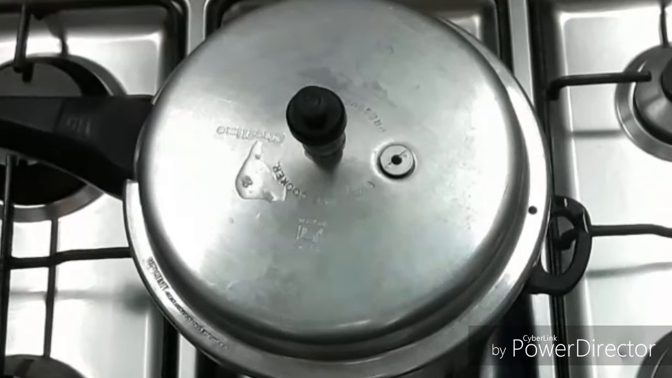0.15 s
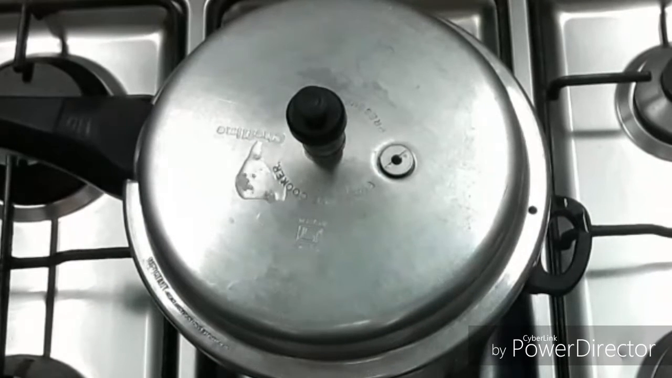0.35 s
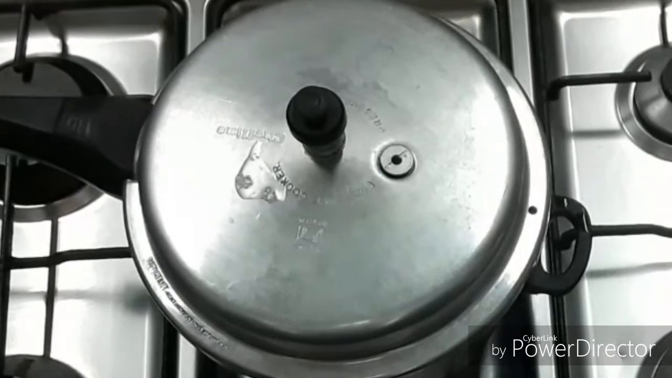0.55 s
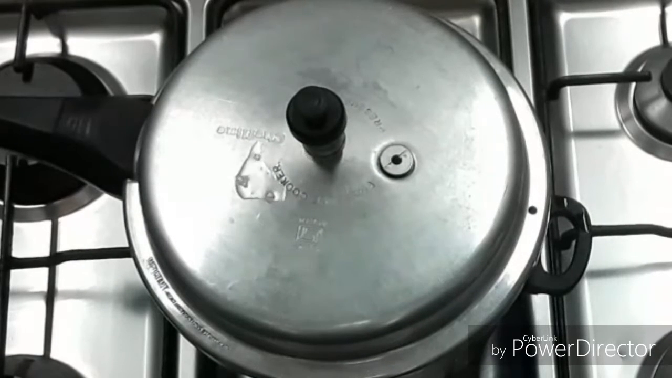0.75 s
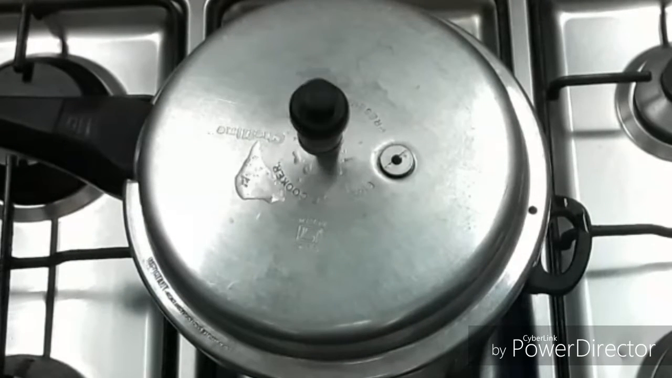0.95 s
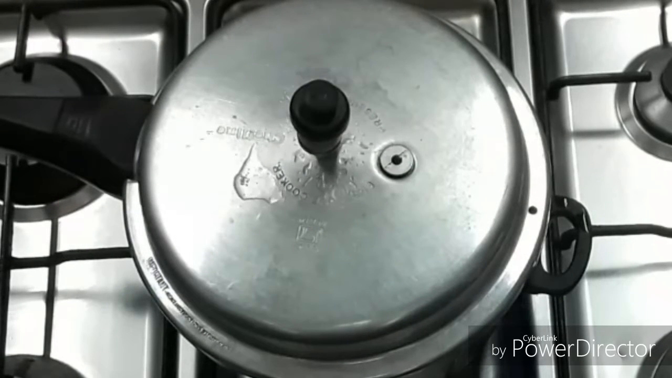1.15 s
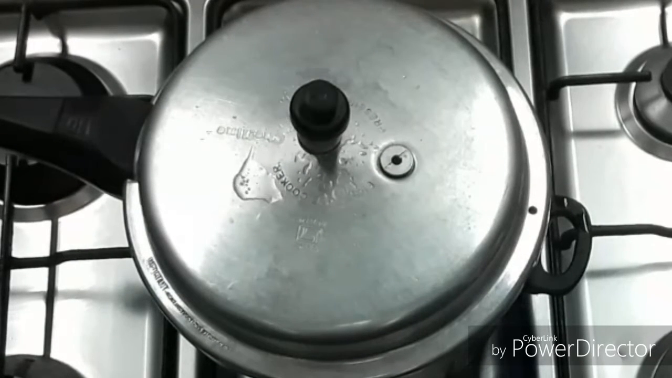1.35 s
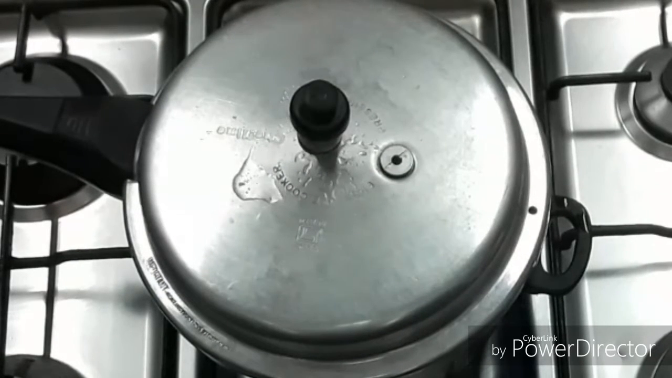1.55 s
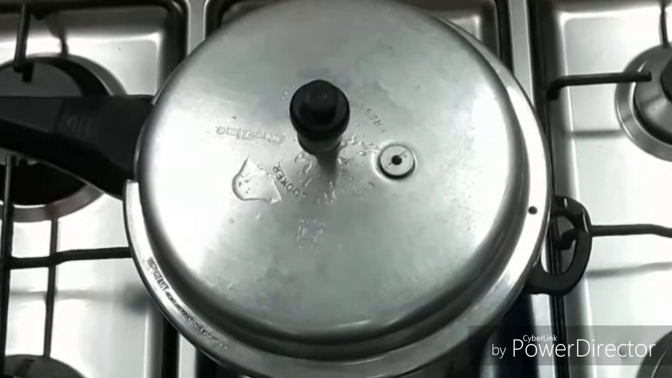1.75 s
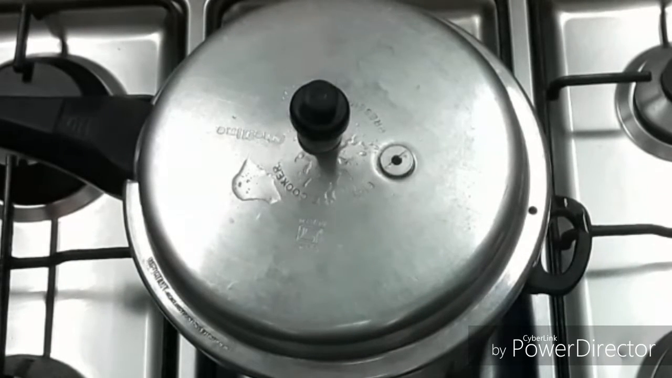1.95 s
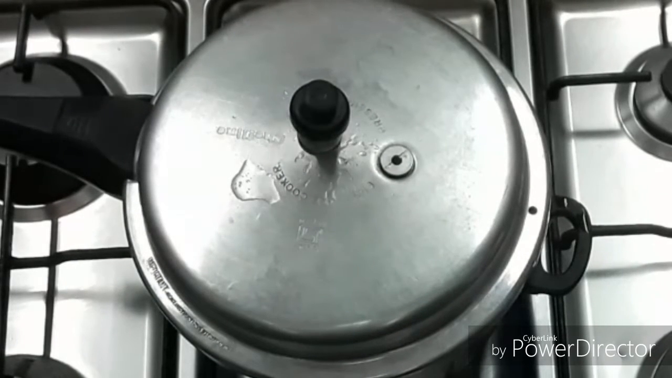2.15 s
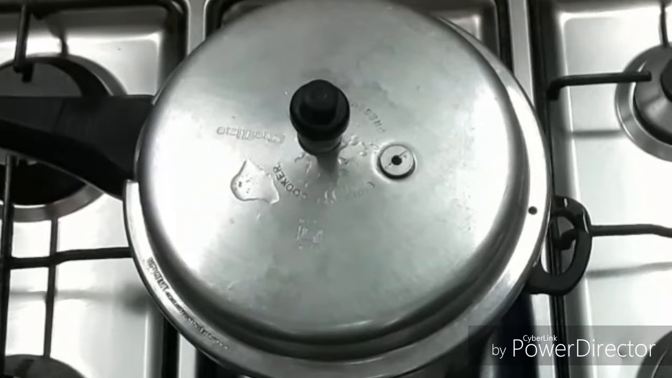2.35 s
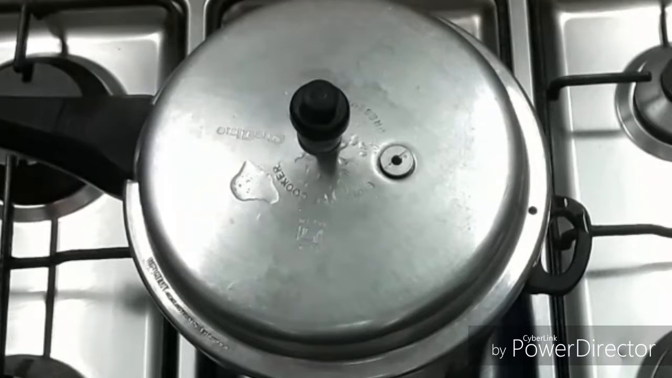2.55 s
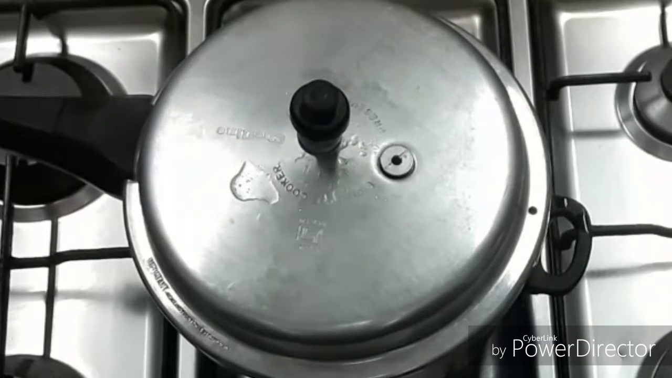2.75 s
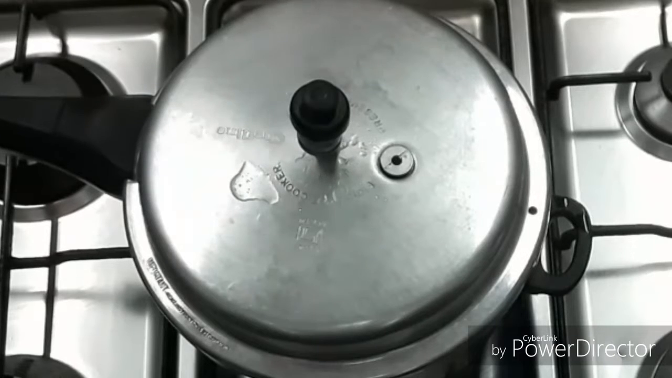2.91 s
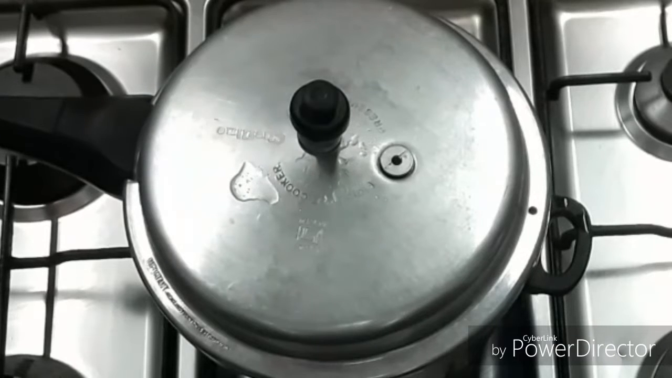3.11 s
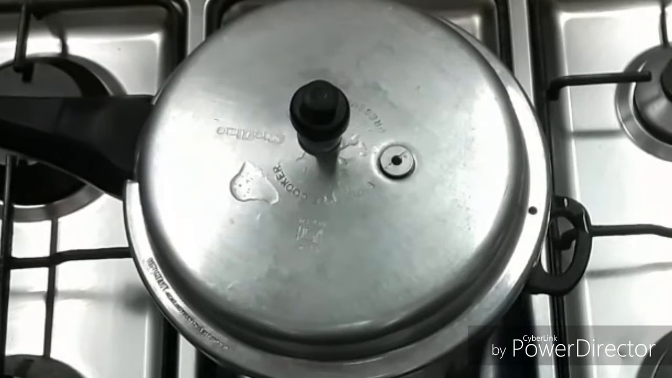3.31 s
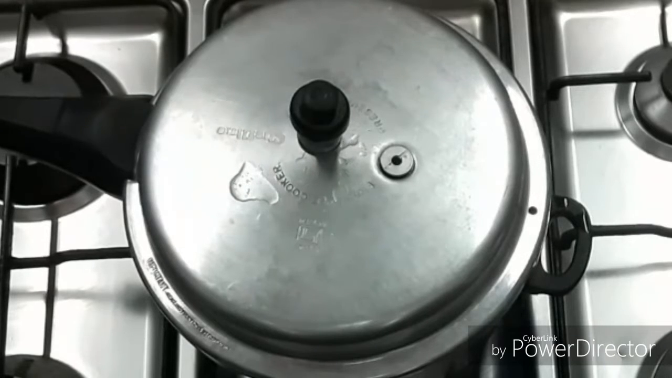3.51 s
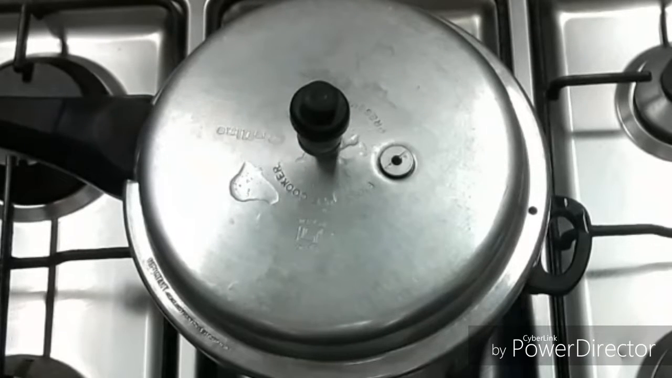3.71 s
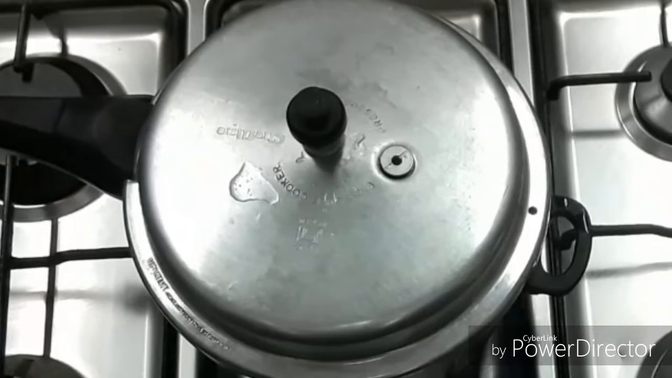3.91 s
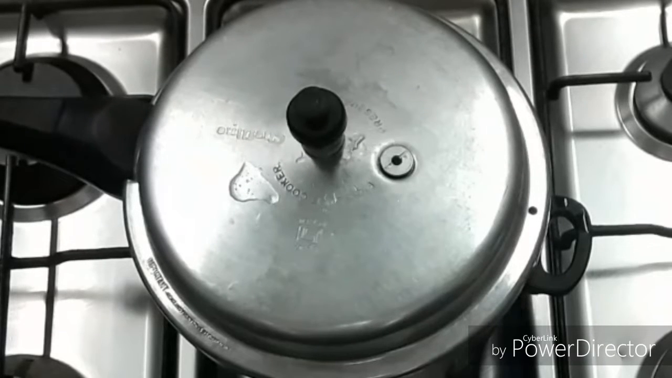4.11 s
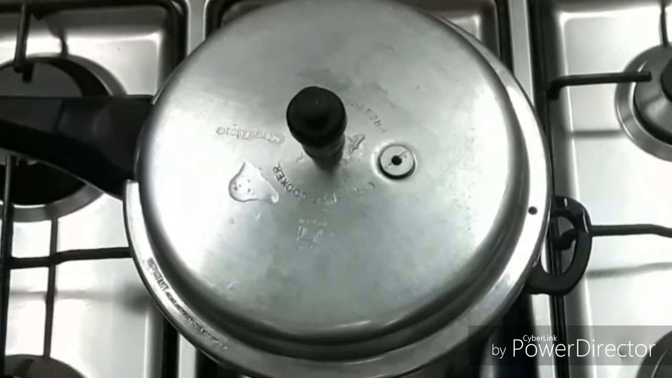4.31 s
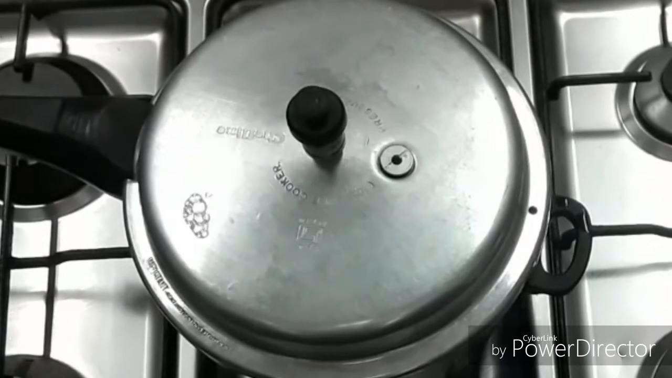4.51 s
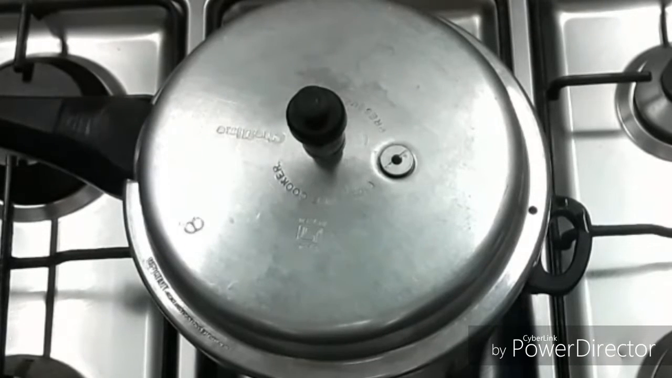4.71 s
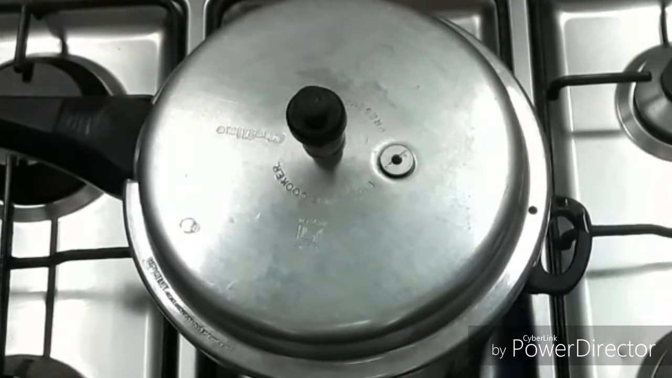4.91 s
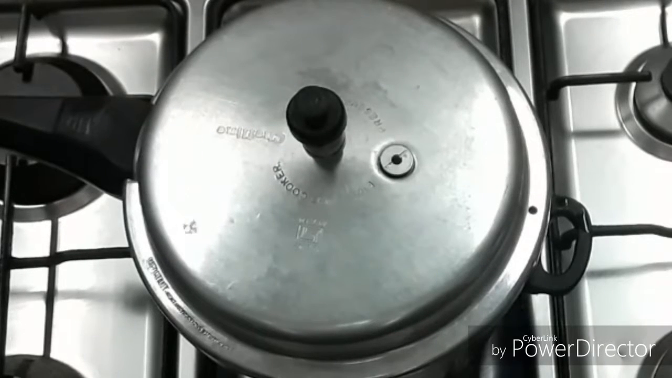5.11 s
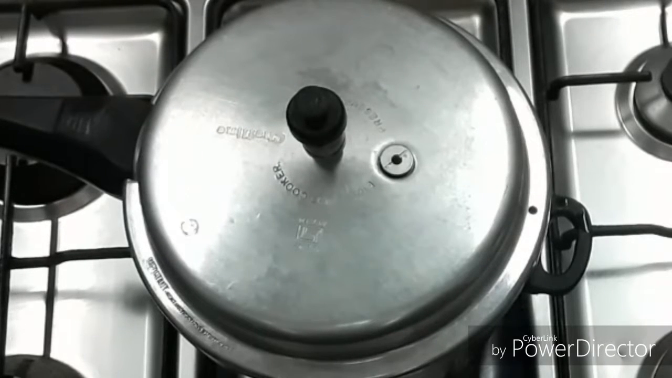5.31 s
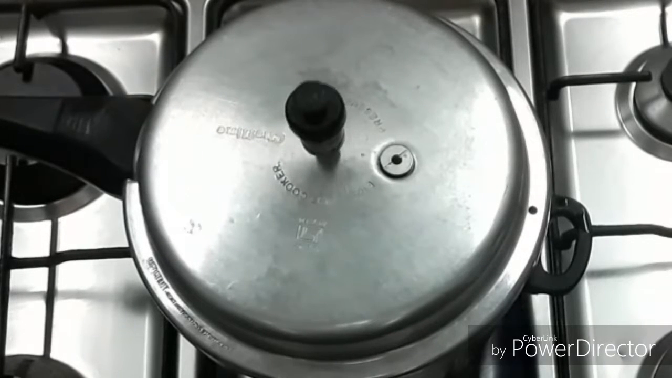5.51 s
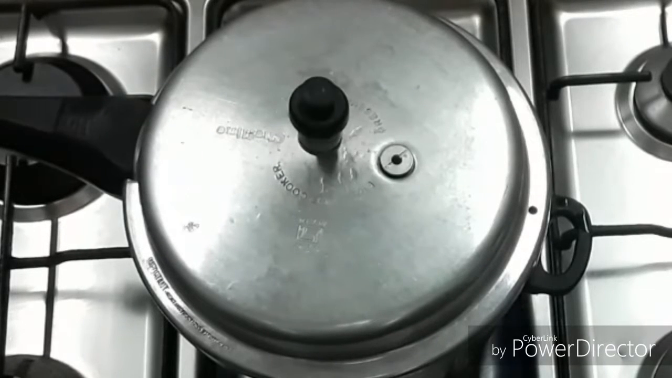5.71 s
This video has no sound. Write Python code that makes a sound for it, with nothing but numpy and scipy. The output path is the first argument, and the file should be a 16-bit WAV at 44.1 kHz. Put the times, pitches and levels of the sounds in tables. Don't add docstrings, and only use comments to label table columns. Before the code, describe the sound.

In a hard-walled kitchen, a gas flame flutters and a pressure cooker seeps thinly. At about one second steam bursts out with sputtering thumps on the close microphone, holding a bright, harsh hiss for three seconds. The weight drops with a small double metallic clink and the hiss dies in a short reverberant tail. After a quiet stretch with two abrupt cuts, a second blast begins.

```python
import sys
import numpy as np
from scipy import signal
from scipy.io import wavfile
from scipy.ndimage import uniform_filter1d

SR = 44100
rng = np.random.default_rng(int(sys.argv[2]) if len(sys.argv) > 2 else 0)


def to_wav(sig):
    pcm = np.clip(np.atleast_2d(sig), -1, 1) * 32767
    pcm = np.round(pcm).astype(np.int16)
    wavfile.write(sys.argv[1], SR, pcm.T)


def volts(x):
    e = np.asarray(x, float) / 20
    return 10 ** e


N = 254016


def evened(x):
    return x / np.sqrt(np.mean(x ** 2) + 1e-20)


def read(points, hz):
    f, value = np.transpose(points)
    return np.interp(np.log(hz + 1), np.log(f + 1), value)


def noise(field_db, size, patchy_db, swell_db):
    hop = size // 4
    frames, hz = N // hop + 5, np.fft.rfftfreq(size, 1 / SR)
    a, b, patches = rng.standard_normal((frames, len(hz), 3)).T
    patches = uniform_filter1d(patches, size // 64, 0)
    patches = evened(uniform_filter1d(patches, 2 + 4000 // hop, 1))
    swell = evened(uniform_filter1d(rng.standard_normal(frames), 1 + 1500 // hop))
    db = field_db(hz, np.arange(frames) * hop / SR) + patchy_db * patches + swell_db * swell
    return signal.istft((a + 1j * b) * volts(db), nperseg=size, noverlap=size - hop)[1][:N]


def room_drift_db():
    # time in seconds, background level in dB.
    drift_points = [(0, 0), (.9, 0.5), (4.2, -2.5), (4.5, -3), (4.53, 0.5), (5.76, 0.5)]
    return np.interp(np.arange(N) / SR, *np.transpose(drift_points))


def fridge():
    # frequency in Hz, level in dB rms.
    motor_orders = [(866.7, -71), (1270, -66), (1384, -69), (1615, -65), (1733, -73), (1846, -70),
                    (1906, -70), (1965, -74), (2326, -73)]
    motor_hz, motor_db = 56, -65
    t = np.arange(N) / SR
    waver = evened(uniform_filter1d(rng.standard_normal((len(motor_orders), N)), 6000, 1))
    hum = volts(motor_db + 2.5 * waver[0]) * np.sin(2 * np.pi * motor_hz * t)
    for (hz, db), w in zip(motor_orders, waver):
        hum += np.sqrt(2) * volts(db + 0.69 * w) * np.sin(2 * np.pi * (hz * t + .05 * w))
    return volts(2.2 * room_drift_db()) * hum


def burner():
    # frequency in Hz, level in dB per Hz.
    flame_spectrum = [(62, -41), (105, -1.5), (273, -0.5), (300, -1.5), (331, 1), (443, -5.5), (592, -6.5),
                      (1210, -15), (1270, -10.5), (1670, -14.5), (2120, -30), (5000, -16), (6500, -40.5),
                      (11000, -120)]
    pot_hz, pot_width_hz, pot_db, flame_db = 335, 35, 4, -49.5

    def colour(hz, s):
        hump = pot_db * np.exp(-((hz - pot_hz) / pot_width_hz) ** 2)
        return (read(flame_spectrum, hz) + hump)[:, None] + 0 * s

    roar = noise(colour, size=2048, patchy_db=.6, swell_db=.8)
    return volts(room_drift_db() + flame_db) * evened(roar)


def lid():
    # frequency in Hz, level in dB, t60 in seconds.
    lid_modes = [(1000, -31.5, .28), (1950, -37, .2), (2370, -36, .15)]
    land_s, bounce_s, contact_s = 3.992, 4.055, 0.0057
    t = np.arange(N) / SR
    rock = evened(uniform_filter1d(uniform_filter1d(rng.standard_normal(N), 700), 700))
    ring = np.zeros(N)
    for hit_s in (land_s, bounce_s):
        since = np.maximum(t - hit_s, 0)
        onset = 1 - np.exp(-since / contact_s)
        for hz, db, t60 in lid_modes:
            ring += volts(db - 60 * since / t60) * np.sin(2 * np.pi * hz * since + .8 * rock) * onset
    return volts(3. * rock + 0.5) * ring


def gusts():
    # time in seconds, size in dB, push +1 or pull -1, number of flaps.
    puffs = [(1.0547, -13, -1, 1), (1.0673, -9, -1, 1), (1.081, -14, 1, 2), (1.0842, -11, 1, 2),
             (1.0878, -9, 1, 3), (1.0914, -11, 1, 1), (1.0987, -15, -1, 1), (1.101, -12, 1, 3),
             (1.1138, -13, 1, 1), (1.119, -9, 1, 1), (1.1292, -6, 1, 1), (1.1355, -16, -1, 1),
             (1.1731, -22, 1, 1), (1.2208, -22, 1, 1), (1.2583, -15, 1, 1), (1.2766, -19, -1, 1),
             (1.3645, -22, -1, 1), (1.4078, -4.5, 1, 1), (1.4498, -21, -1, 1), (1.4897, -20, -1, 1),
             (1.5108, -18, 1, 1), (1.5428, -7, 1, 1), (2.7629, -10, 1, 1), (3.4062, -22, 1, 1),
             (5.7265, -8, -1, 1), (5.739, -10, -1, 2), (5.7455, -15, 1, 1), (5.749, -8.5, -1, 3),
             (5.7543, -12, 1, 2)]
    # time in seconds, spit level in dB.
    plume_hits = [
        (1.078, -24.5),
        (5.745, -15),
    ]
    flap_s, flap_db = .0009, .5
    burst_db, burst_s = 8.5, .06
    rise_db_per_s, sag_db_per_s, last_s, end_db_per_s = 997, 16, 0.52, 90
    train, t = np.zeros(N), np.arange(N) / SR
    for s, db, way, flaps in puffs:
        for k in range(flaps):
            train[round((s - .0005 + k * flap_s) * SR)] = way * (-1) ** k * volts(db + 2.0 + k * flap_db)

    plume = np.zeros(N)
    for s, db in plume_hits:
        approach_db = -rise_db_per_s * np.maximum(s - t, 0)
        sag_db = -sag_db_per_s * np.maximum(t - s, 0)
        end_db = -end_db_per_s * np.maximum(t - s - last_s, 0)
        plume += volts(db + approach_db + sag_db + burst_db * (t < s + burst_s) + end_db)
    spits = plume * rng.standard_normal(N) * (rng.random(N) < 500 / SR)

    u = np.arange(300) / SR
    snap, heave, flick = ((u / (2 * ease_s)) ** 2 * np.exp(2 - u / ease_s)
                          for ease_s in (.00014, .00034, .00008))
    push = .72 * snap + .4 * heave
    thumps = signal.oaconvolve(train, push) + signal.oaconvolve(spits, flick)
    bass_cut = signal.butter(3, 84., "high", fs=SR, output="sos")
    return signal.sosfilt(bass_cut, thumps[:N])


def flow_db(s):
    # time in seconds, jet level in dB.
    steam_flow = [(0, -54), (.35, -50), (.834, -47), (.95, -35), (.992, -20), (1.046, -13.5), (1.08, -10.5),
                  (1.125, -18.5), (3.975, -18), (4.086, -30.5), (4.24, -66.5), (4.5, -68.5), (4.525, -53.5),
                  (5.2, -50), (5.565, -41.5), (5.623, -31.5), (5.665, -14.5), (5.76, -15)]
    # centre in seconds, change in dB, length in seconds.
    wobbles = [
        (.882, 3, 0.0087),
        (1.18, 1.5, 0.11),
        (2.008, -2, 0.027),
        (2.278, 1.5, 0.08),
        (2.608, 0, 0.43),
        (3.253, 0.5, 0.17),
        (5.672, 0.5, 0.01),
    ]
    wobble_db = sum(db * np.exp(-((s - at) / length) ** 2) for at, db, length in wobbles)
    return np.interp(s, *np.transpose(steam_flow)) + wobble_db


def steam():
    zones_hz = [250, 2000, 6500, 9000, 12000]
    # frequency in Hz, level in dB per Hz.
    jet_low = [(35, -53), (60, -20), (249, -11.5), (289, -13), (1340, -10.5), (2170, -5), (3090, -4.5),
               (5000, 1), (6500, 27), (11000, -120)]
    jet_high = [(3060, -37), (5200, -7), (5910, -1.5), (6630, -2), (7050, 8.5), (7300, 0), (9510, -5),
                (10500, -11.5), (12000, -10.5), (13200, -6), (14900, -6.5)]
    # frequency in Hz, width in Hz, depth in dB.
    notches = [(6881, 224, -11), (10370, 340, -3.5)]
    # frequency in Hz, difference in dB.
    seep_tint = [(1000, 1.5), (3000, 2), (4800, -6), (6200, 2), (9500, 2), (10500, 4), (12500, -7),
                 (14000, -1)]
    lift_s, drop_s, reseat_s, open_db = 1.0, 3.985, 4.51, -19
    pinch_s, die_s, lag_s = 0.078, .09, 0.017

    def colour(hz, s):
        shape = np.where(hz < 5100, read(jet_low, hz) - 6.0, read(jet_high, np.minimum(hz, 14900)))
        shape = shape + sum(db * np.exp(-((hz - f) / width) ** 2) for f, width, db in notches)
        level = flow_db(s)
        thin = np.clip((-31.5 - level) / 15, 0, 1)
        over_db = np.maximum(level - open_db, 0)
        drying = np.clip((s - lift_s) / (drop_s - lift_s), 0, 1) * (s < reseat_s)
        pinched = np.exp(-((s - drop_s) / pinch_s) ** 2)
        dying = np.clip((s - drop_s) / die_s, 0, 1) * (s < reseat_s)
        reseated = (s >= reseat_s) * np.clip((open_db - level) / 8, 0, 1)
        rising = np.clip((level - flow_db(s - lag_s)) / 12, 0, 1)
        # (roar dB, edge dB, fizz dB)
        states = [((-2.24, -0.82, -4), 1 + 0 * s),
                  ((6, 0, 2.5), thin),
                  ((0.09, -0.16, -0.33), over_db),
                  ((0.1, 2.54, 2.4), drying),
                  ((5.1, 4.4, 3.4), pinched),
                  ((10.3, 0, -6), dying),
                  ((1.2, -.6, -4), reseated),
                  ((0.5, 1.2, -3.5), rising)]
        roar, edge, fizz = sum(np.outer(shift, state) for shift, state in states)
        bend = [1.1 * (roar + 1.04), roar, 0 * s, edge, fizz]
        share = np.array([read(list(zip(zones_hz, one)), hz) for one in np.eye(len(bend))])
        return shape[:, None] + share.T @ bend + np.outer(read(seep_tint, hz), thin)

    jet = noise(colour, size=512, patchy_db=0.84, swell_db=0.0)
    core_band = signal.butter(4, [5000, 8000], "band", fs=SR, output="sos")
    core = signal.sosfilt(core_band, jet)
    return jet / np.std(core) * volts(flow_db(np.arange(N) / SR))


def kitchen(x):
    # frequency in Hz, t60 in seconds.
    room_decay = [(200, 0.27), (1000, 0.92), (2900, 0.35), (4100, 0.66), (6000, 0.41), (9700, 0.35),
                  (13000, 0.24)]
    taps = np.zeros((3, SR // 2))
    at = np.arange(120, SR // 2 - 20, 20)
    at = at + rng.integers(0, 20, (3, len(at)))
    np.put_along_axis(taps, at, rng.choice([-1., 1.], at.shape), 1)
    hz, t, z = signal.stft(taps, SR, nperseg=256)
    t60 = read(room_decay, hz)[:, None]
    tails = signal.istft(z * volts(-60 * t / t60) / np.sqrt(t60), SR, nperseg=256)[1]
    tails = tails / np.linalg.norm(tails[0])
    cycles = 0.48 * np.arange(N) / SR + np.arange(3)[:, None] / 3
    turns = np.cos(2 * np.pi * cycles) * np.sqrt(2 / 3)
    return signal.fftconvolve(x * turns, tails, axes=1)[:, :N].sum(0)


def widened(x):
    # centre in seconds, low edge in Hz, high edge in Hz.
    wide_moments = [(1.5747, 12400, 14000), (1.9927, 5500, 8500), (2.3874, 5000, 7100),
                    (2.3874, 13700, 15400), (3.0376, 6100, 7800), (3.7574, 5500, 7000),
                    (3.7574, 12300, 14700), (4.872, 10300, 12500), (4.872, 13100, 15300),
                    (5.4525, 5600, 8500)]
    t, mix = np.arange(N) / SR, x.copy()
    for s, low_hz, high_hz in wide_moments:
        band_pass = signal.butter(8, [low_hz, high_hz], "band", fs=SR, output="sos")
        band = signal.sosfiltfilt(band_pass, x[0])
        window = np.cos(np.pi / 2 * np.clip((t - s) * SR / 900, -1, 1)) ** 2
        unrelated = np.roll(band, 3000) * [[1], [-1]]
        mix += window * (np.sqrt(.5) * unrelated - 0.35 * band)
    return mix


def scene():
    bass_cut = signal.butter(4, 70., "high", fs=SR, output="sos")
    jet = signal.sosfilt(bass_cut, steam())
    mono = fridge() + burner() + lid() + gusts() + volts(-8.0) * kitchen(jet) + volts(0.5) * jet
    return np.array([mono, mono])


def low_pass(x):
    return signal.sosfilt(signal.butter(12, 16670, fs=SR, output="sos"), x)


def record(dry):
    # time in seconds, fade-in in seconds.
    scene_changes = [
        (4.511, 0.019),
        (4.727, 0.011),
    ]
    hiss_db, edge_hz = -65, 15490
    t = np.arange(N) / SR
    fade = np.ones(N)
    for s, length in scene_changes:
        fade *= np.where(t < s, 1, np.clip(0.065 + (t - s) / length, 0, 1))
    heard = (dry + volts(hiss_db) * rng.standard_normal(N)) * fade
    squeezed = 1.265 * np.tanh(heard / 1.314)
    band_limit = signal.firwin(2047, edge_hz, window=("kaiser", 11), fs=SR)
    return low_pass(signal.oaconvolve(widened(squeezed), band_limit[None], "same"))


dry = scene()
out = record(dry)
to_wav(out)
```